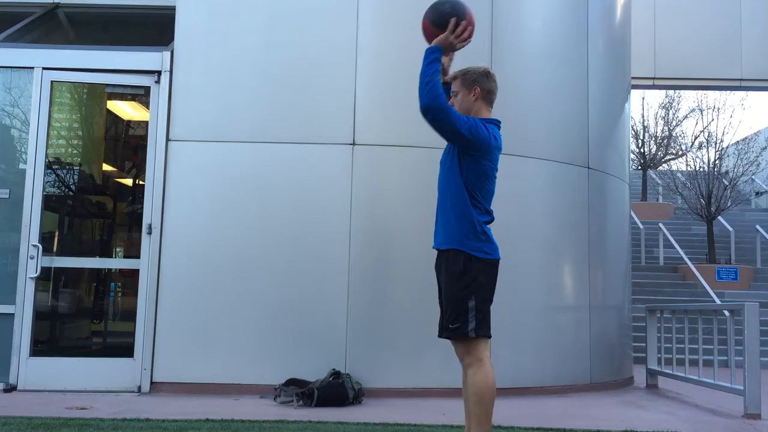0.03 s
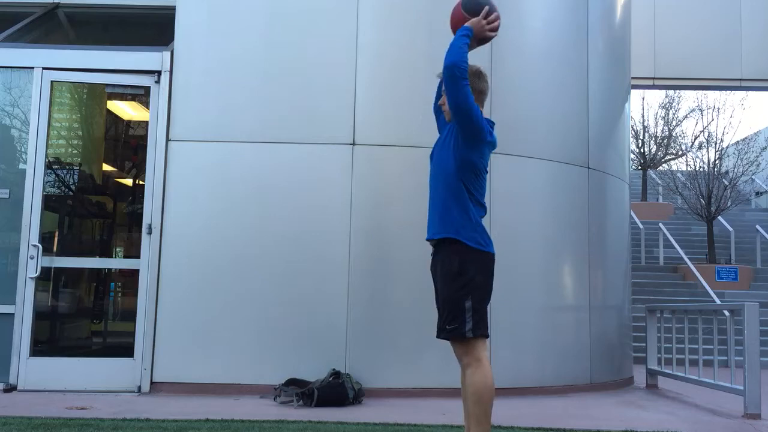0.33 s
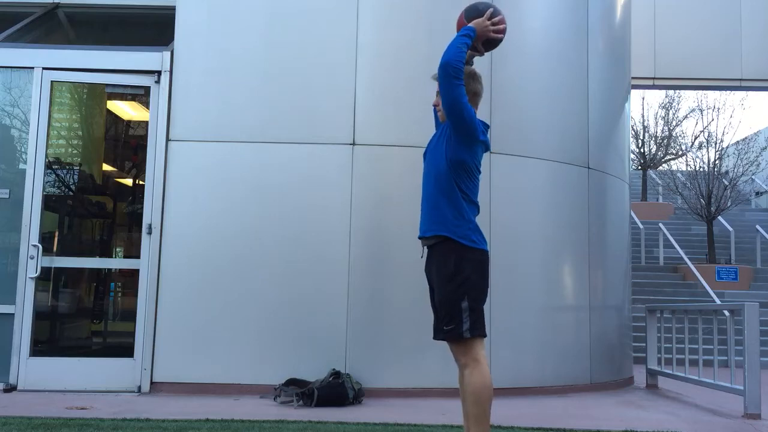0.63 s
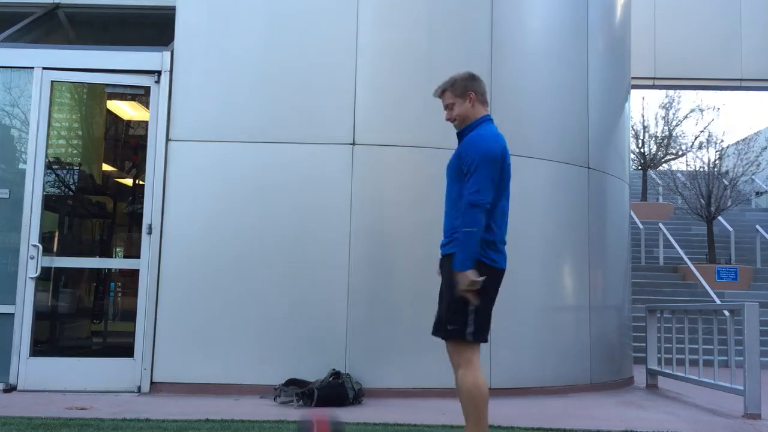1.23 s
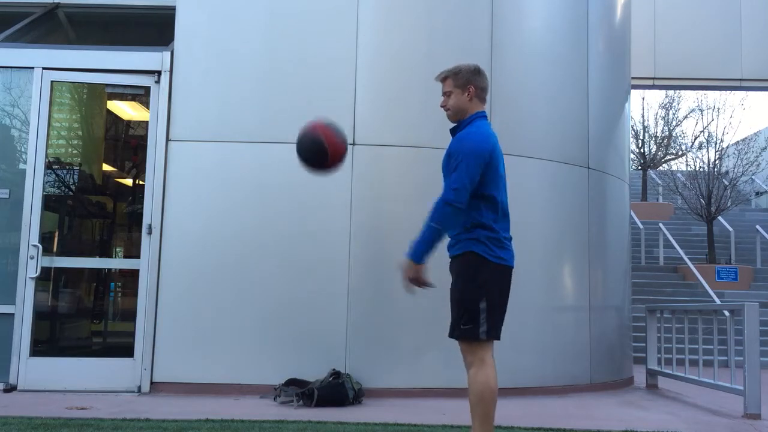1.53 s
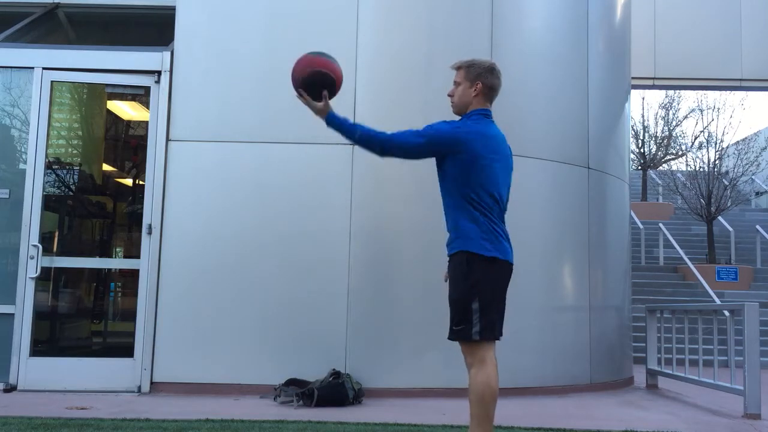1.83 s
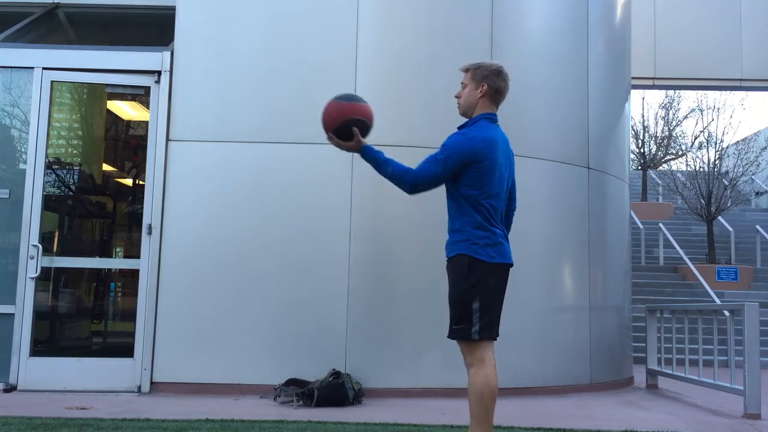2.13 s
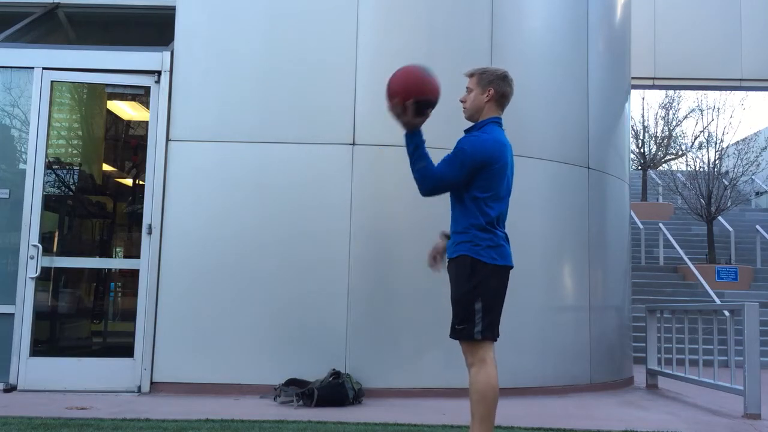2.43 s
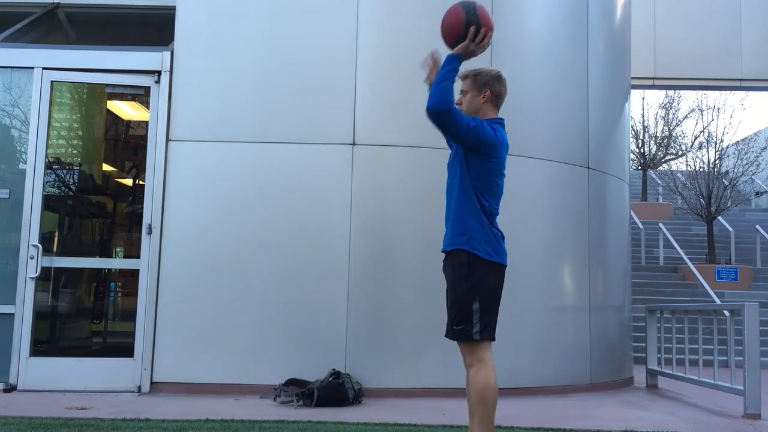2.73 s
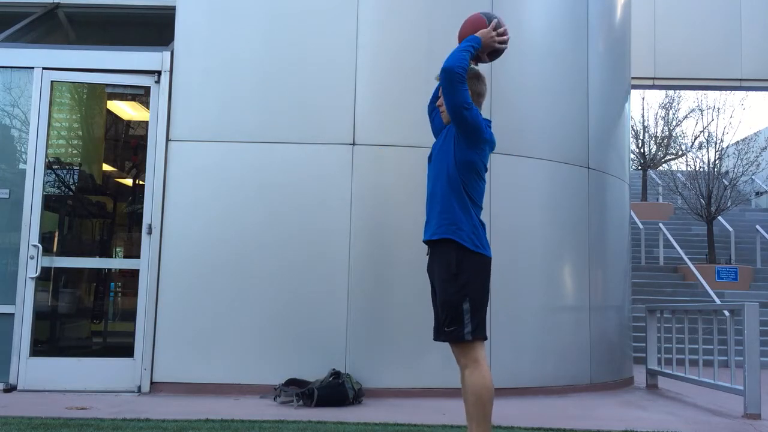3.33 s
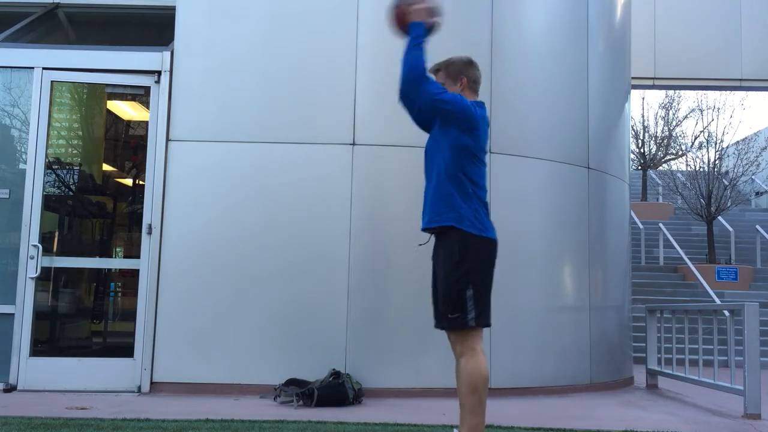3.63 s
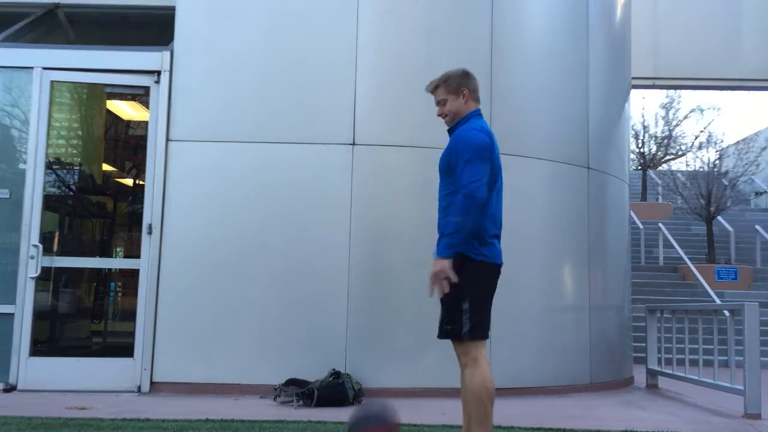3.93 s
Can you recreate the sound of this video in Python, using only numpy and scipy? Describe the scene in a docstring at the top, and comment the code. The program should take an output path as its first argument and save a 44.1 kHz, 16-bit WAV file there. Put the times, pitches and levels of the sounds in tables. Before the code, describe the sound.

One sharp thud of a heavy rubber ball on artificial turf, with traffic humming far off.

```python
"""Outdoors on artificial turf beside a metal-clad wall, one microphone, traffic rumbling far off.
Sleeves swish on a downswing and a rubber medicine ball is slammed once, at 1.4 s: the blades crunch,
the skin slaps, the ball thuds. The wall throws back a short echo; the recorder ducks and recovers.
Hands pat the caught ball and it slides in the palm. Near the end a faint tone sounds in the distance
and the sleeves swish again over the hum of the street."""
import sys
import numpy as np
from scipy import signal
from scipy.fft import rfft, irfft
from scipy.io import wavfile
from scipy.ndimage import uniform_filter1d

SR = 44100
rng = np.random.default_rng(int(sys.argv[2]) if len(sys.argv) > 2 else 0)


def generate_wav(sig):
    """Save sig (samples, or channels by samples) to the path in sys.argv[1] as 16-bit PCM at SR."""
    pcm = np.round(np.clip(np.atleast_2d(sig).T, -1, 1) * 32767).astype(np.int16)
    wavfile.write(sys.argv[1], SR, pcm)


N = 176400

# modes of ball and ground: pitch_hz, level_db, t60_s, rise_s, lag_s
BALL_MODES = [(1297, -17, 0.0087, 0.00012, 0.00025), (1790, -21, 0.0098, 0.00048, 0),
              (2255, -32.5, 0.013, 0.0003, .0001), (6100, -39.5, 0.014, 0.00016, 0),
              (696, -25, 0.034, 0.0055, -.0032), (522, -30.5, 0.062, 0.0015, -0.012),
              (400, -2, 0.017, 0.0017, .0005), (323, -19.5, 0.073, 0.0027, .0032),
              (140, -2.5, 0.044, 0.0038, .0078), (65, -5, 0.12, 0.017, .0025)]
# crunch of the blades: frequency_hz, density_db
TURF_SPECTRUM = [(300, -6), (1500, 8.5), (2400, -6.5), (3000, -14), (3700, -10), (4100, -6.5), (5600, -7.5),
                 (6100, -3), (7500, -9), (8700, -1), (10500, -14), (12600, -4.5), (16000, -13)]
# echoes off wall and door: delay_s, level_db
ECHOES = [(0.0172, -13), (0.0203, -18)]
# tone of all reflected sound: frequency_hz, gain_db
WALL_RESPONSE = [(60, -18), (140, 3), (230, -3), (350, 1), (700, 2), (1200, -1.5), (2200, 3.5), (3200, -2),
                 (16000, -7.5)]
# decay of the yard: frequency_hz, t60_s
YARD_DECAY = [(100, 0.16), (1000, 0.15), (5000, 0.17), (15000, 0.19)]
# hand pats on the ball: peak_s, level_db
PATS = [(1.876, -52), (2.349, -46.5)]
# hand on rubber: frequency_hz, density_db
PAT_SPECTRUM = [(100, 13), (400, 1), (950, 12), (1600, 3), (2500, -20), (6000, -40), (16000, -50)]
# slides in the palm: peak_s, level_db, half_width_s
SLIDES = [(1.91, -74, .055), (2.13, -74, 0.069)]
# sliding rubber: frequency_hz, density_db
PALM_SPECTRUM = [(2000, -5), (5200, -13), (6300, 2), (7200, -12), (11000, -16), (16000, -18)]
# sleeve swishes: peak_s, level_db, power_rise_s, power_fall_s
SWISHES = [(1.277, -69, 0.018, 0.0033), (1.308, -68.5, 0.0097, 0.01), (3.825, -81, .015, .015),
           (3.98, -68.5, .02, 0.0062)]
# rubbing cloth: frequency_hz, density_db
CLOTH_SPECTRUM = [(2000, -17), (5000, -3), (8000, 2.5), (10500, 0), (13500, 6), (16000, 0.5)]
# far-off tone: peak_s, pitch_hz, level_db, half_width_s
FAR_TONES = [(3.52, 695, -49, 0.041)]
# far engines: pitch_hz, level_db, bandwidth_hz
ENGINE_HUM = [(131.7, -43.5, 6.7), (206, -53.5, 2.4), (238.25, -53, 3.6)]
# distant traffic: frequency_hz, density_db
TRAFFIC_SPECTRUM = [(15, -11), (28, -16), (40, -16), (48, 1), (75, 0), (90, -2.5), (140, -0.5), (190, -5),
                    (260, -8.5), (340, -12), (450, -20), (600, -22.5), (850, -25.5), (1400, -29.5),
                    (2200, -39), (3200, -48.5), (5000, -57), (6500, -57.5), (8000, -62), (9300, -60.5),
                    (10400, -66), (12000, -63.5), (16000, -70.5)]
# swell of its mid-range wash: time_s, gain_db
WASH_SWELL = [(0, -1.7), (1.2, -1.5), (1.9, 2), (2.4, 0.6), (3.4, -0.7), (4, -2)]

SLAM_S = 1.3779  # the ball lands flat
FREQ_HZ = np.fft.rfftfreq(N, 1 / SR)


def ball():
    """The skin slaps, then ball and ground thud: the lowest modes answer later, as the ball squashes."""
    out = np.zeros(N)
    for hz, db, t60, rise, lag in BALL_MODES:
        t = np.maximum(since(SLAM_S + lag), 0)
        envelope = amp(db - 60 * t / t60) * (1 - np.exp(-t / rise))
        out += envelope * np.sin(2 * np.pi * hz * t)
    return out


def turf():
    """Grainy crunch that swells as the blades are flattened, snaps, and dies once the ball is down."""
    crunch_db, scatter_db, rise_db, t60_s = -33.5, 5.5, 3, 0.046
    lead_s = 0.0029  # the blades are touched before full contact
    snap_db, snap_width_s = -38, 0.00035
    t = since(SLAM_S)
    grains = white() * amp(scatter_db * white())
    shape_db = np.where(t < 0, rise_db * t / lead_s, -60 * t / t60_s)
    crunch = amp(crunch_db + shape_db) * (t > -lead_s)
    snap = amp(snap_db) * np.exp(-abs(t) / snap_width_s)
    return colour(grains, TURF_SPECTRUM) * (crunch + snap)


def courtyard(x):
    """Two quick echoes off the nearby wall and door and a short tail, all thin in the deep bass."""
    tail_db, tail_delay_s = -13, 0.021
    t = np.arange(SR // 2) / SR
    hz, at, bands = signal.stft(rng.standard_normal(len(t)) * (t > tail_delay_s), SR, nperseg=256)
    decay = amp(-60 * at / read(YARD_DECAY, hz)[:, None])
    tail = signal.istft(bands * decay, SR, nperseg=256)[1][:len(t)]
    yard = amp(tail_db) * rfft(tail / np.linalg.norm(tail), N)
    echoes = sum(amp(db) * np.exp(-2j * np.pi * FREQ_HZ * delay) for delay, db in ECHOES)
    return irfft(rfft(x) * (echoes + yard) * amp(read(WALL_RESPONSE, FREQ_HZ)), N)


def hands():
    """Dull pats as the ball is caught and shifted, and the hiss of its rubber sliding in the palm."""
    rise_s, t60_s = 0.0019, 0.079
    pats = sum(amp(db - 60 * abs(since(s)) / t60_s) * np.clip(since(s) / rise_s + 1, 0, 1)
               for s, db in PATS)
    slides = sum(amp(db) * bump(s, width) for s, db, width in SLIDES)
    return pats * colour(white(), PAT_SPECTRUM) + slides * colour(white(), PALM_SPECTRUM)


def sleeves():
    """Cloth rubs on cloth as the arms swing down."""
    level = np.zeros(N)
    for s, db, rise, fall in SWISHES:
        t = since(s)
        level += amp(db) * np.exp(-abs(t) / np.where(t < 0, rise, fall) / 2)
    return level * colour(white(), CLOTH_SPECTRUM)


def far_tone():
    """A brief, faint, wavering tone stands out of the street noise."""
    waver_hz, waver_share = 25, 0.0075
    waver = unit(irfft(rfft(white()) / (1 + (FREQ_HZ / waver_hz) ** 4), N))
    wavering_time = np.cumsum(1 + waver_share * waver) / SR
    return sum(amp(db) * bump(s, width) * np.sin(2 * np.pi * hz * wavering_time)
               for s, hz, db, width in FAR_TONES)


def engines():
    """Far engines hum in narrow, wavering bands of low noise."""
    out = np.zeros(N)
    for hz, db, width in ENGINE_HUM:
        resonance = 1 / (1 + ((FREQ_HZ - hz) / width * 2) ** 2)
        out += amp(db) * unit(irfft(rfft(white()) * resonance, N))
    return out


def traffic():
    """Even distant rumble; the wash above it has drifting patches and fleeting tones, and swells a little."""
    level_db, patch_db, tone_db = -36.5, 1.6, 1.5
    hz, at, bands = signal.stft(white(), SR, nperseg=1024, noverlap=768)
    patches = drift(bands.shape, bins=10, frames=16)
    tones = drift(bands.shape, bins=2, frames=22)
    swell_db = np.interp(at, *np.transpose(WASH_SWELL)) * band(hz, low_hz=500, high_hz=7030)
    flicker_db = (patch_db * patches + tone_db * tones) * band(hz, low_hz=450, high_hz=3200)
    noise = signal.istft(bands * amp(flicker_db + swell_db), nperseg=1024, noverlap=768)[1][:N]
    return amp(level_db) * colour(noise, TRAFFIC_SPECTRUM)


def drift(shape, bins, frames):
    """Random field smoothed over frequency and time, at rms 1."""
    field = uniform_filter1d(rng.standard_normal(shape), bins, axis=0)
    return unit(uniform_filter1d(field, frames, axis=1))


def band(hz, low_hz, high_hz):
    """Soft-edged band weights, as a column."""
    return (hz ** 2 / (hz ** 2 + low_hz ** 2) / (1 + (hz / high_hz) ** 2))[:, None]


def white():
    return rng.standard_normal(N)


def amp(db):
    return 10 ** (np.asarray(db) / 20)


def unit(x):
    """Scales to rms 1."""
    return x / np.sqrt(np.mean(x ** 2) + 1e-20)


def read(points, hz):
    """Reads a table on a log-frequency axis."""
    f, value = np.transpose(points)
    return np.interp(np.log(hz + 1), np.log(f + 1), value)


def colour(x, spectrum):
    """Gives a signal a spectrum, at rms 1."""
    return unit(irfft(rfft(x) * amp(read(spectrum, FREQ_HZ)), N))


def since(s):
    """Seconds since the moment s."""
    return np.arange(N) / SR - s


def bump(peak_s, half_width_s):
    return np.exp(-(since(peak_s) / half_width_s) ** 2)


def scene():
    """At the microphone: the slam and its echo in front, the street far behind."""
    slam = ball() + turf()
    return (slam + courtyard(slam) + sleeves() + hands() + traffic() + engines() + far_tone())[None]


def record(dry):
    """The microphone sheds deep bass; the recorder opens late, ducks on the slam and cuts the top treble."""
    open_s, low_cut_hz, top_hz = 0.0725, 42, 15950
    threshold_db, duck_share, release_db_per_s = -25, 0.23, 23.5
    mic = irfft(rfft(dry) * FREQ_HZ ** 4 / np.sqrt(FREQ_HZ ** 8 + low_cut_hz ** 8), N)
    power_db = 10 * np.log10(signal.lfilter(np.ones(882) / 882, [1], mic[0] ** 2) + 1e-12)  # 20 ms mean
    fall_db = np.arange(N) / SR * release_db_per_s
    held_db = np.maximum.accumulate(power_db + fall_db) - fall_db  # peaks sink at the release rate
    duck_db = duck_share * np.maximum(held_db - threshold_db, 0)
    ducked = mic / amp(duck_db) * (since(open_s) > 0)
    low_pass = signal.firwin(511, top_hz, window=("kaiser", 9), fs=SR)
    return signal.oaconvolve(ducked, low_pass[None], "same")


dry = scene()
out = record(dry)
generate_wav(out)
```